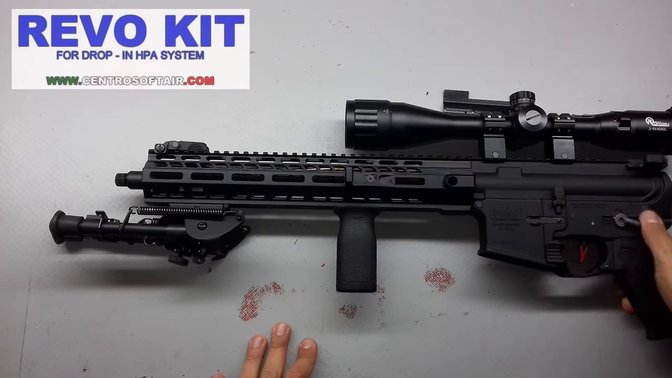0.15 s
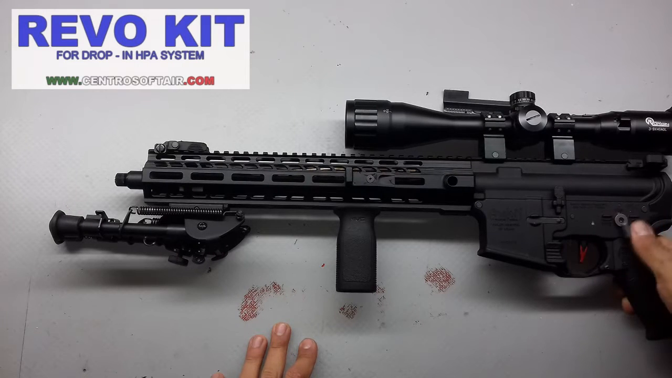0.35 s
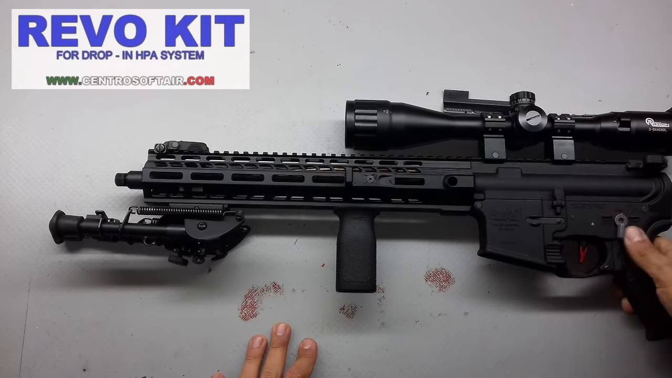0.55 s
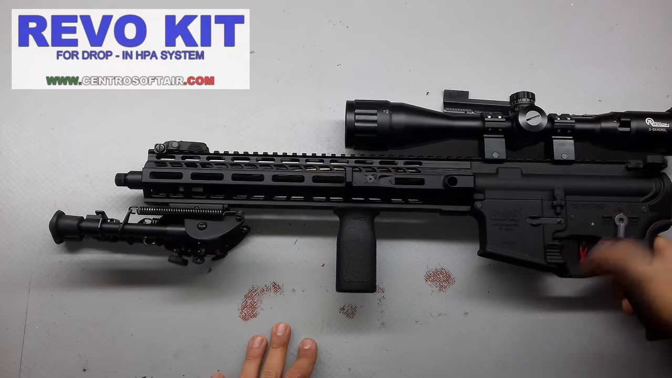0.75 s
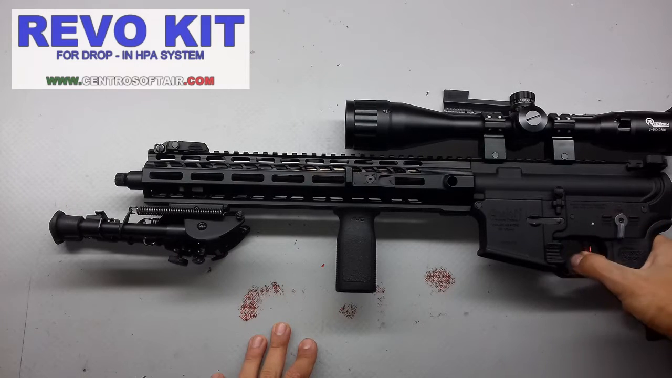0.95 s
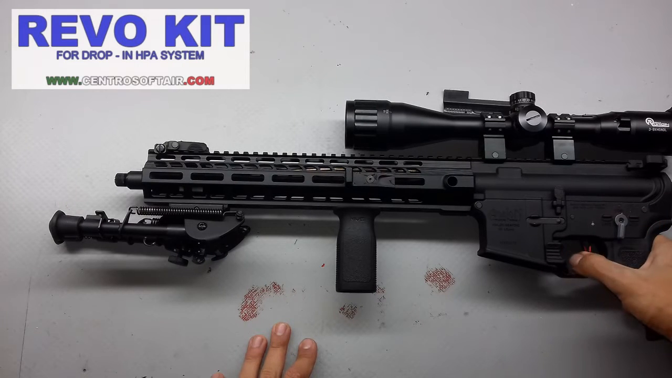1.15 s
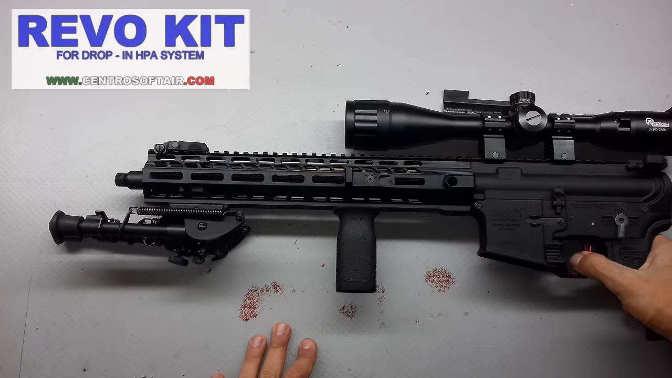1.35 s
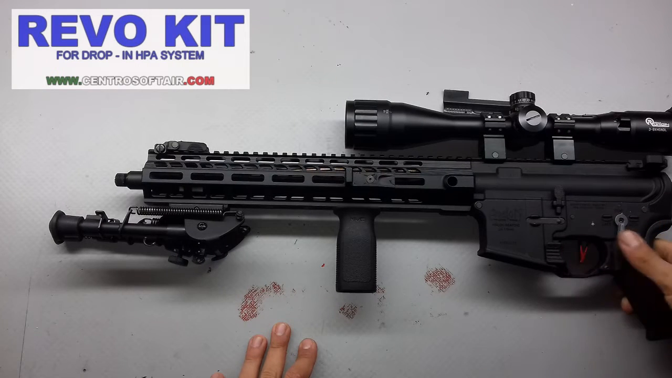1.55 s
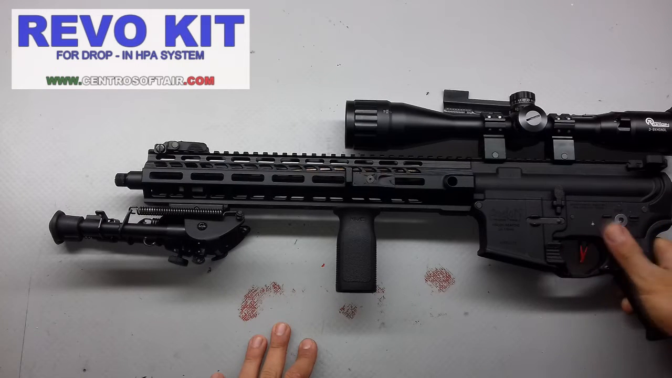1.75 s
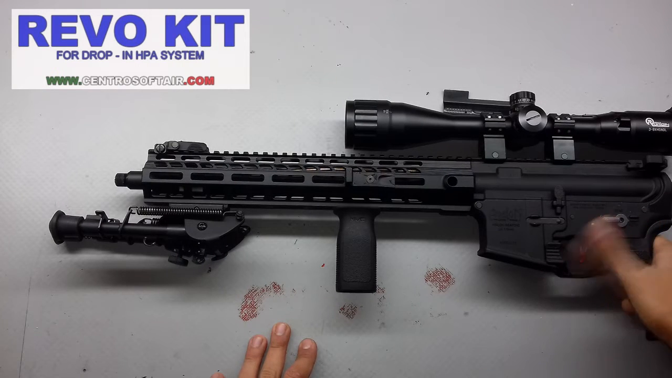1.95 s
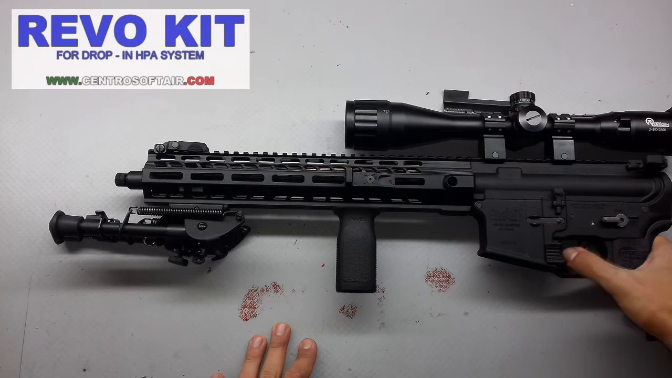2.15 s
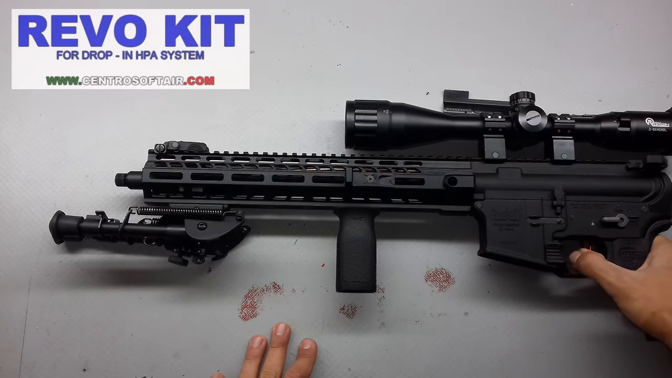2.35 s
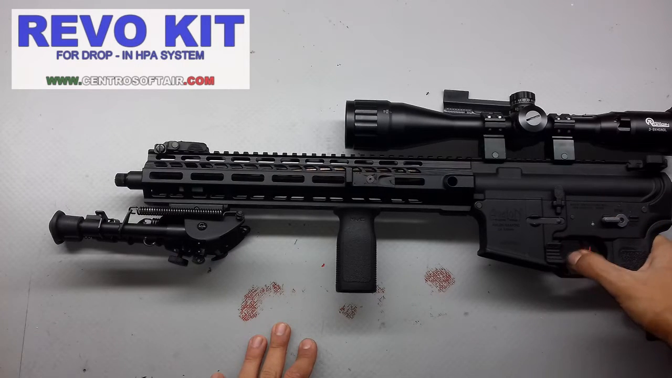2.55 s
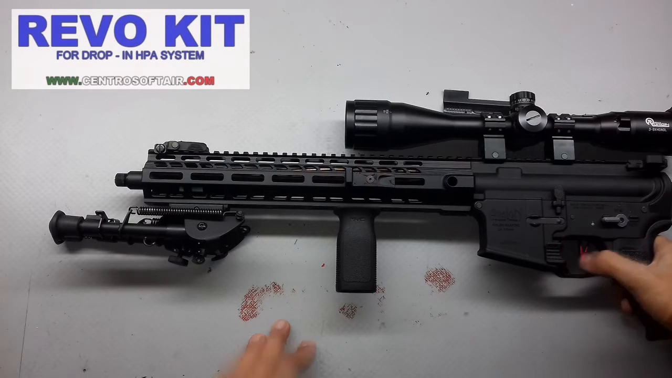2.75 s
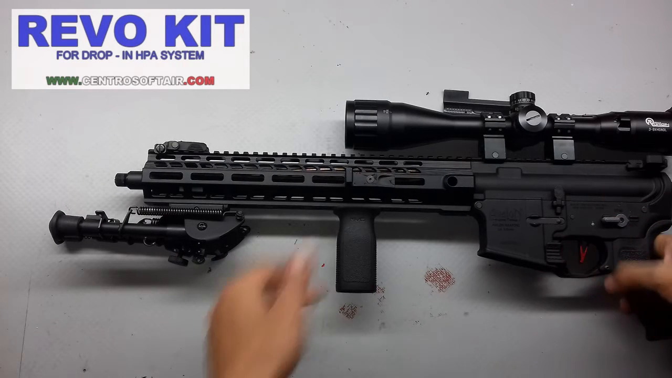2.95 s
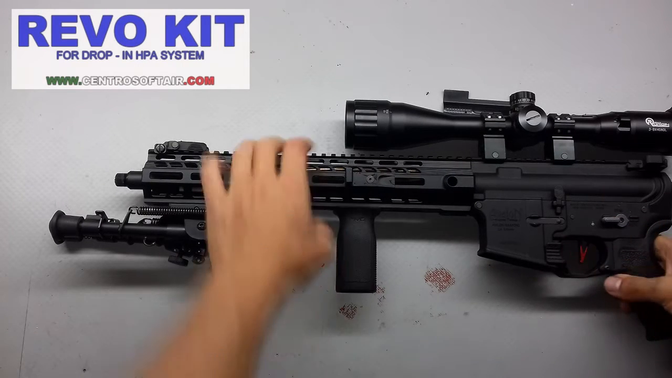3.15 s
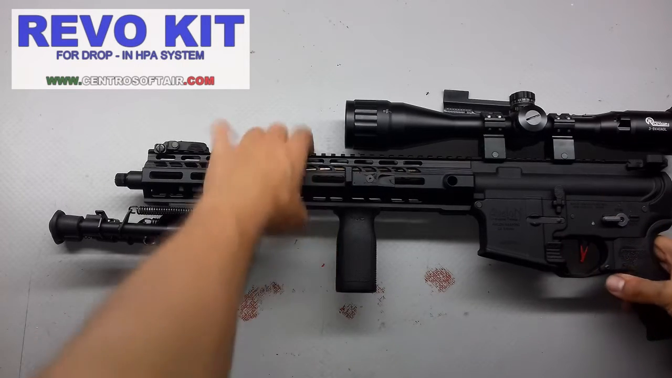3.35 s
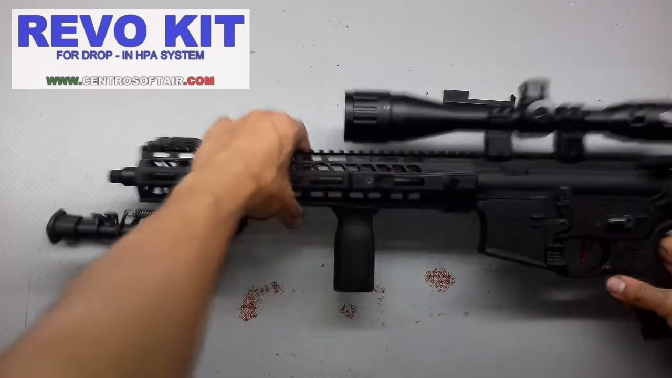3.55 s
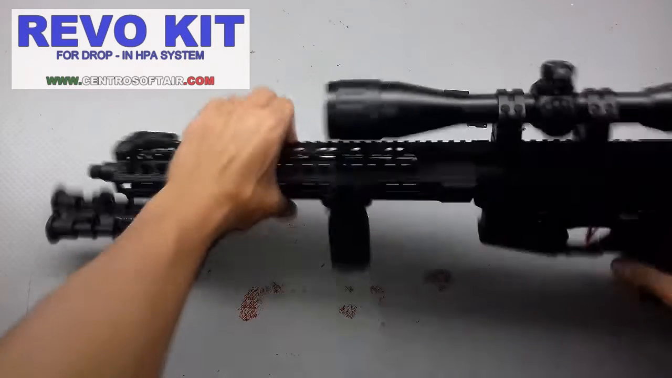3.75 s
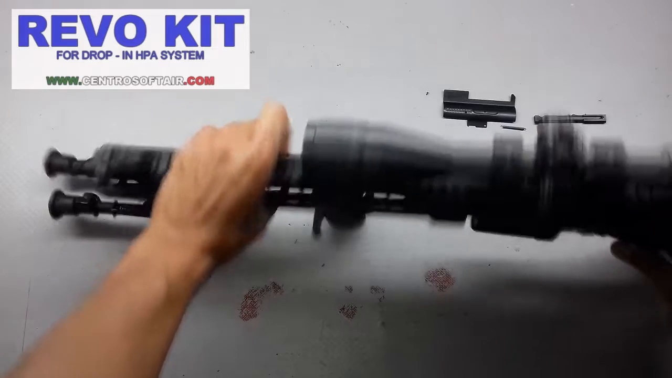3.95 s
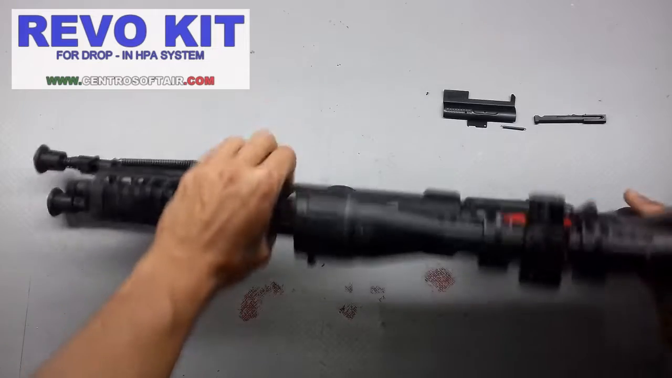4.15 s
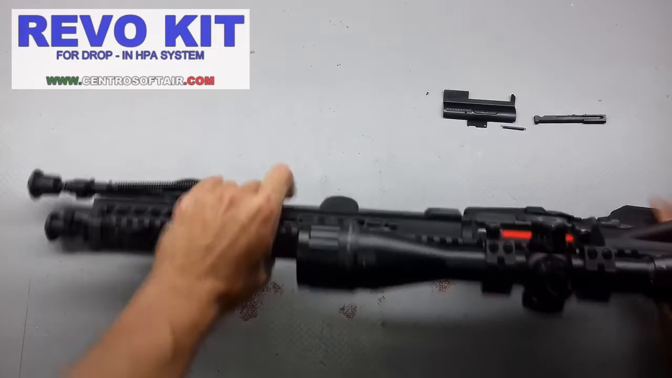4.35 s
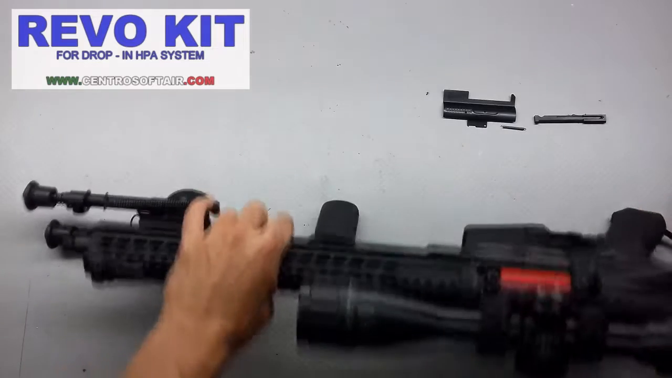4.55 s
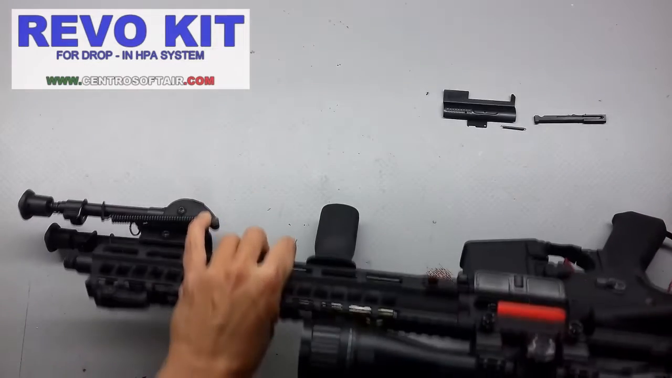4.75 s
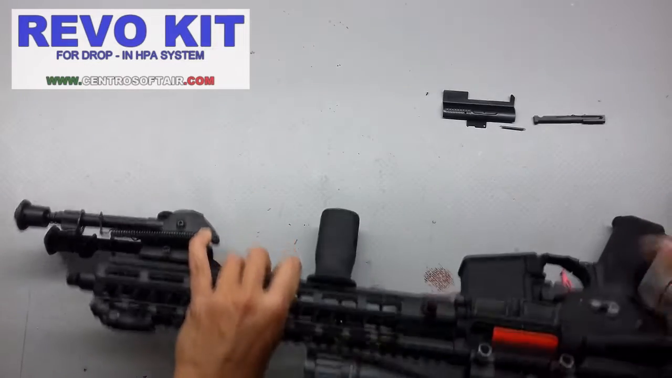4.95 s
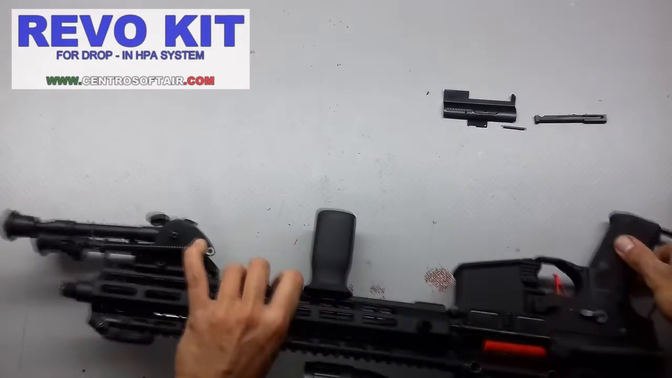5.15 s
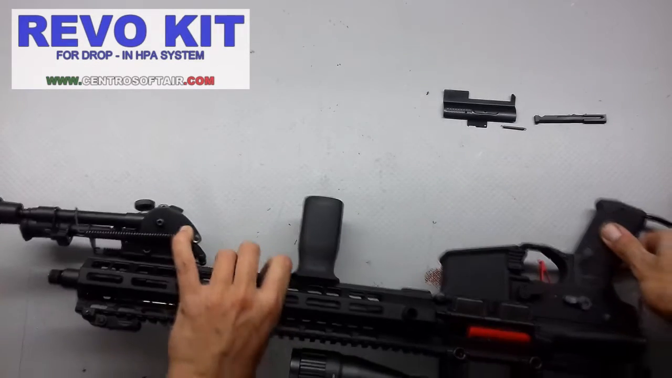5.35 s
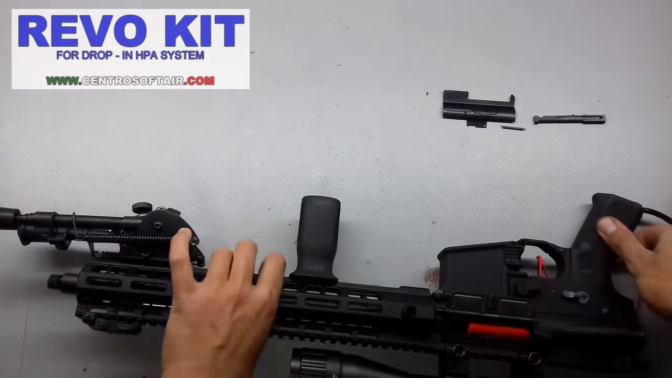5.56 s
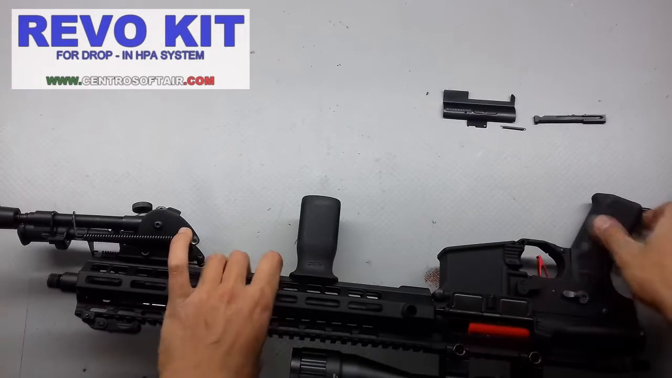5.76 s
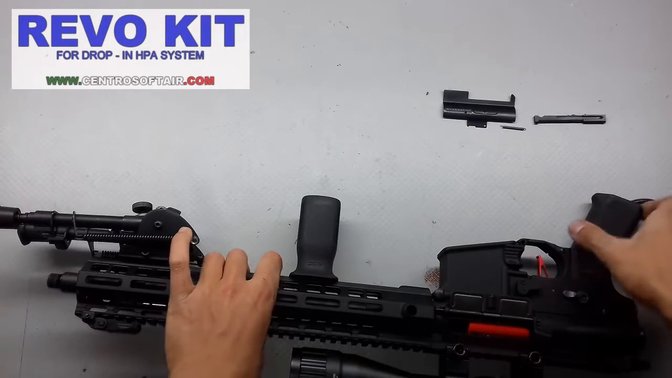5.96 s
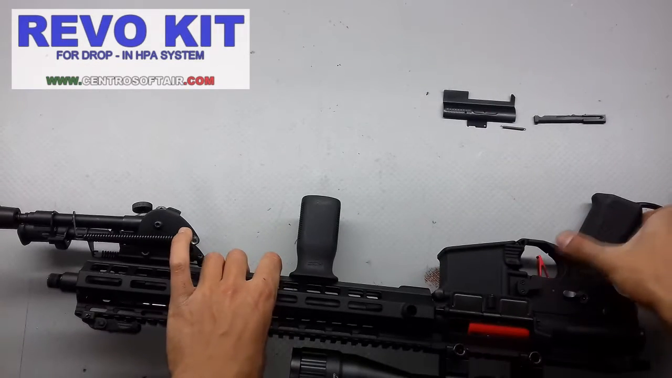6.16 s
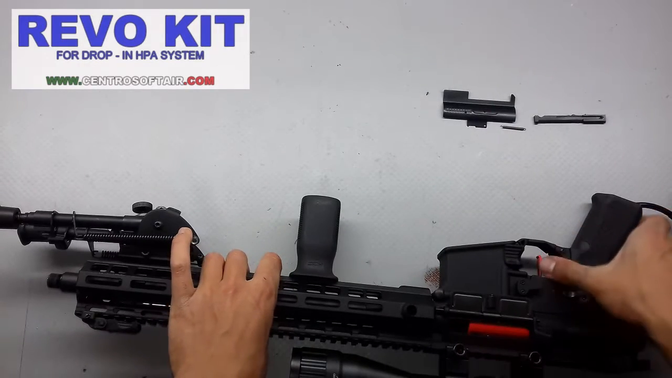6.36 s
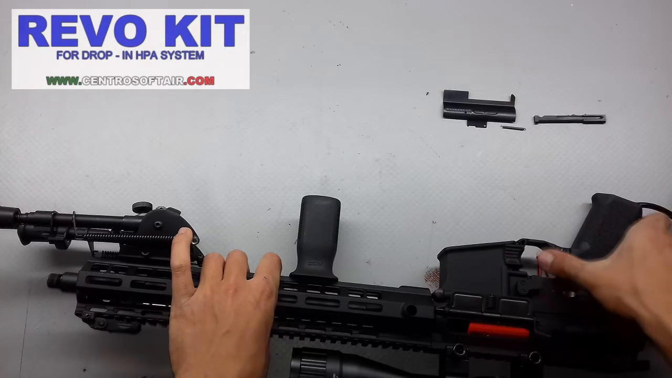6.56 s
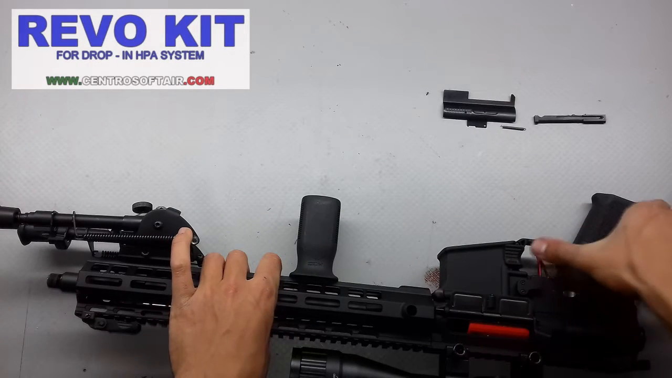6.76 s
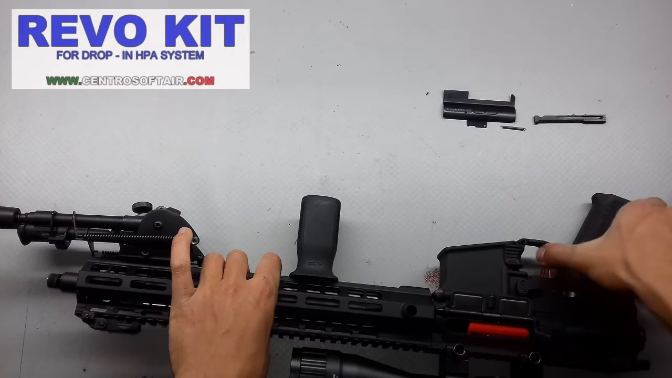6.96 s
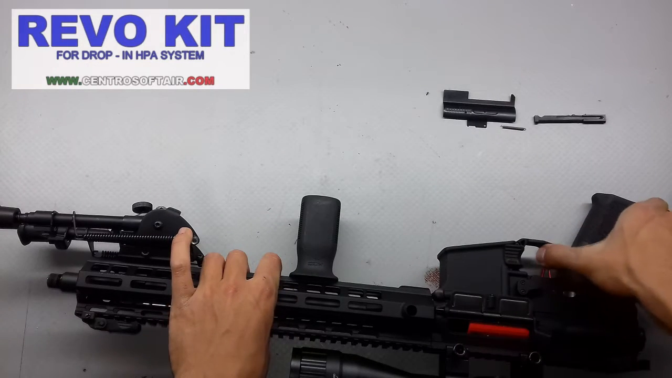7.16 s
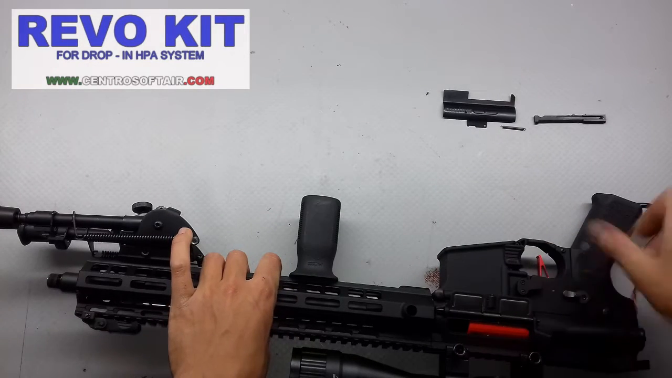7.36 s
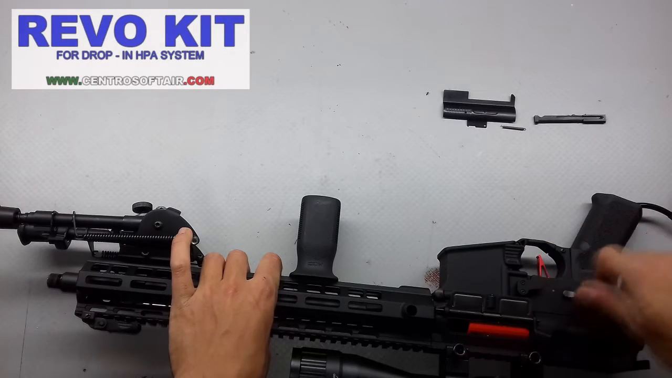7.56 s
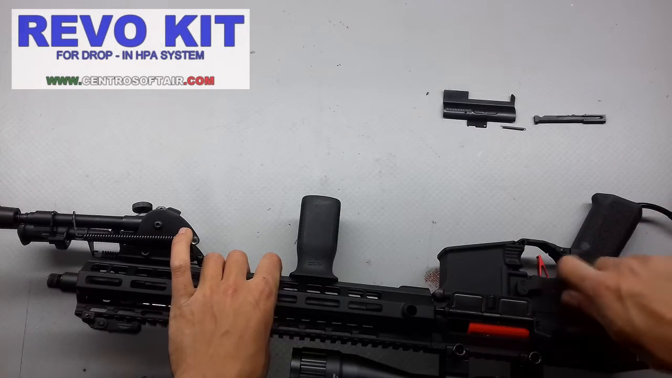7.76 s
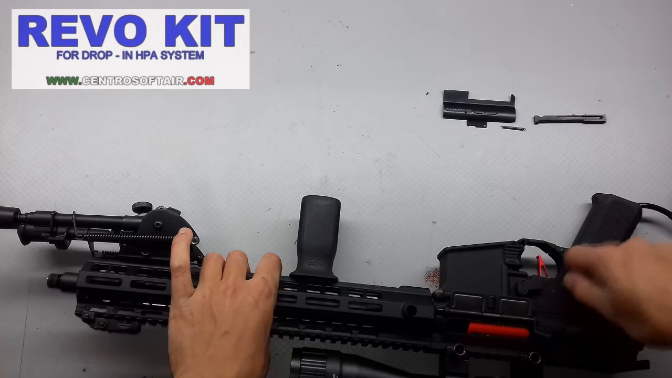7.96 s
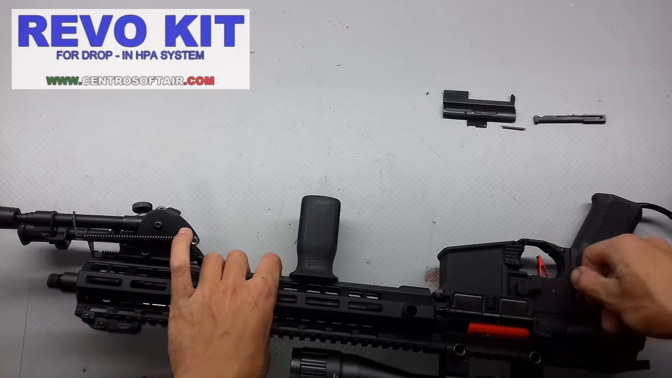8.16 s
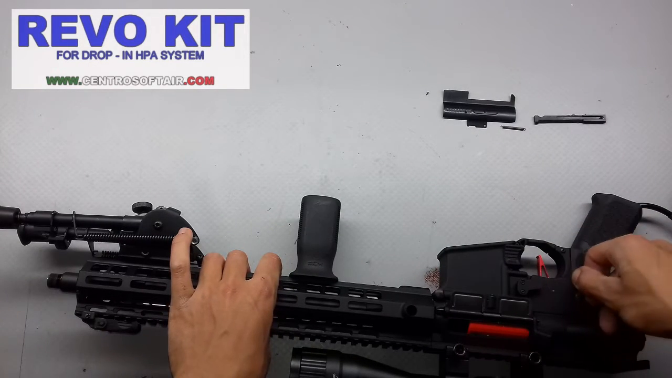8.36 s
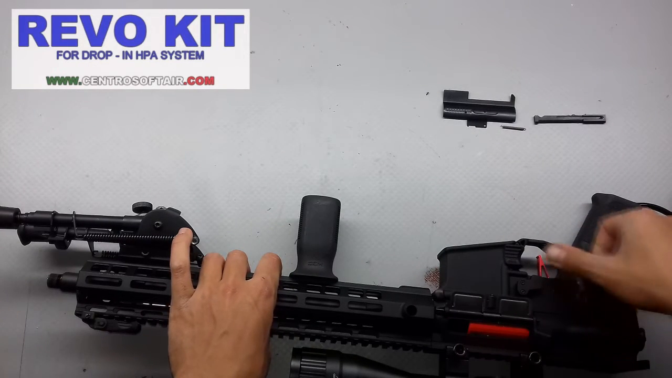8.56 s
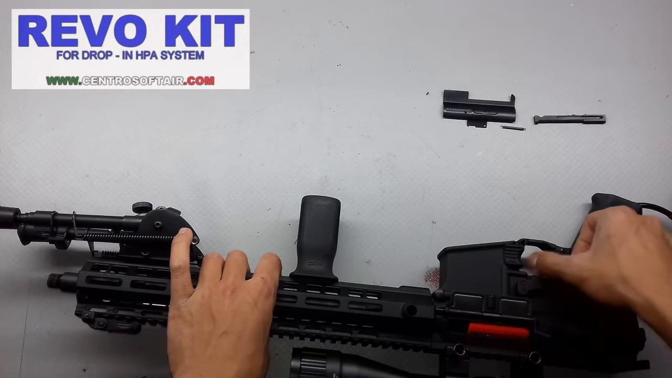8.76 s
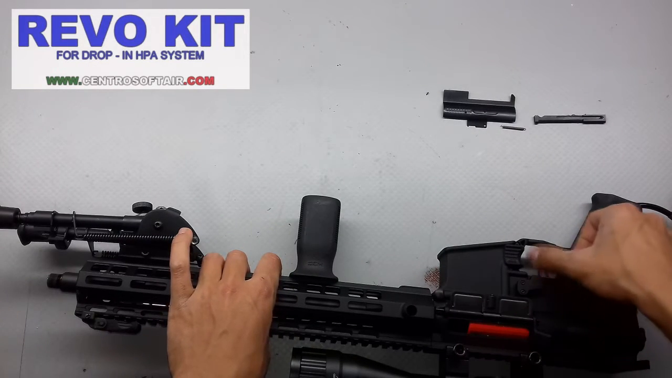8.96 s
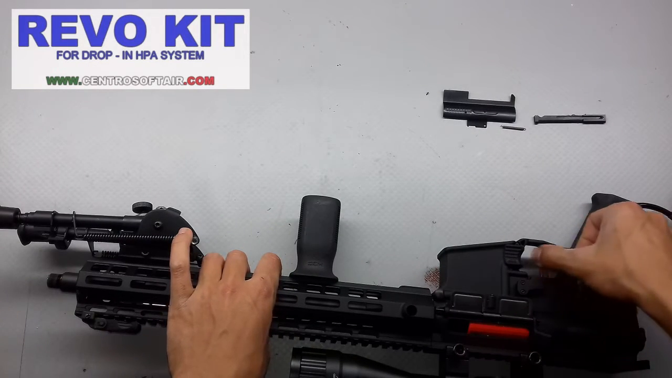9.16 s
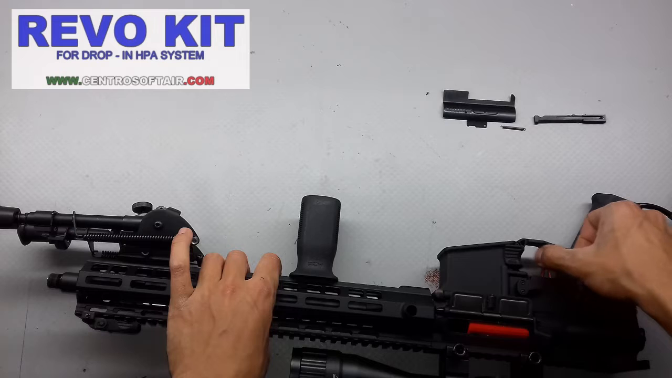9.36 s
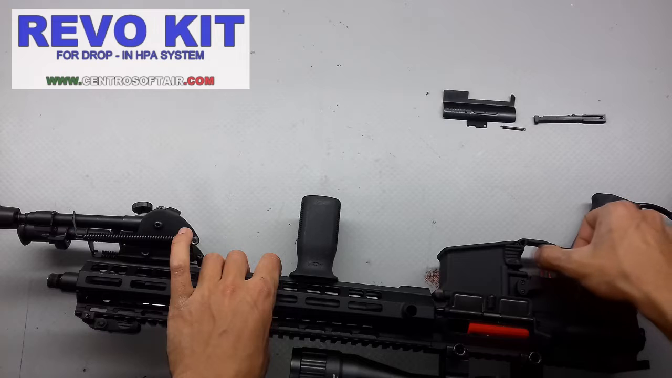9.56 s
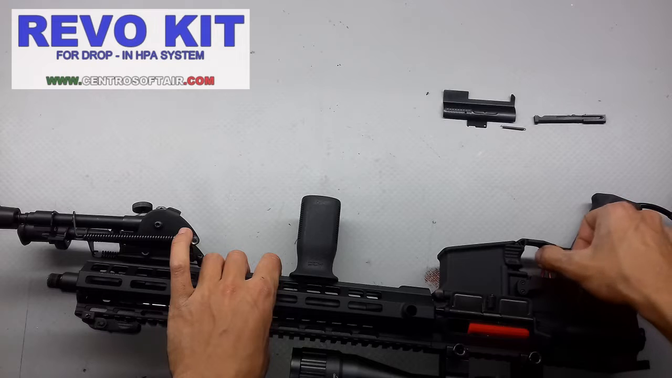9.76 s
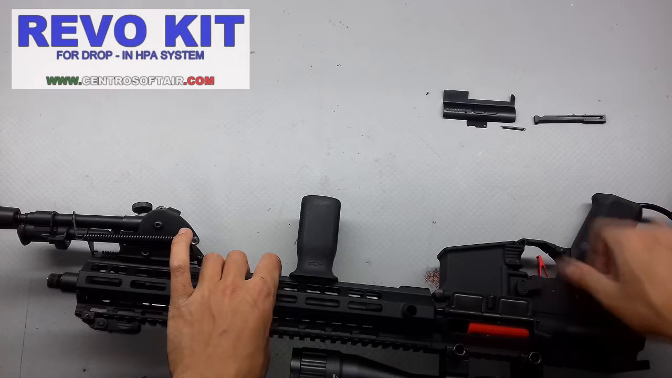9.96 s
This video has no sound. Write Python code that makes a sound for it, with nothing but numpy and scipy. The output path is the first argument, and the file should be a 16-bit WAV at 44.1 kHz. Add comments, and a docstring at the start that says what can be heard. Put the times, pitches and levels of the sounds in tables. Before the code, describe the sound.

A small, live room with very faint steady hiss, closely miked. Soft selector clicks and a dragged lever tick within the first half second. Loud single air shots crack at about 1.0, 1.2 and 1.35 s: a punchy pop, spitting valve hiss, metallic clack, brief rising hoot and short room reflections. A crisp click at 1.85 s precedes a rapid, even six-round burst from 2.25 to 2.6 s, building slightly. From 2.9 s hands rustle over the rifle with faint squeaks; dull knocks land around 4.1-4.2 s with small rocking bumps, then clacks and thuds at 5.05-5.3 s. Light rubbing and lever ticks continue to about 6.3 s. A second six-round burst runs 6.97-7.35 s. A sharp click snaps at 7.8 s, with fainter ones after. Single shots follow at 8.85, 9.1, 9.5 and 9.67 s, then a faint click at 9.9 s.

```python
"""A small room with a table: an air-driven airsoft rifle is dry-fired, single shots and two six-round bursts.
Each shot is filtered impulses for the pop of air, hissing noise for the valve and a gliding sine for the
barrel's hoot. Between shots, filtered noise and dying sines make the selector's clicks, rubbing hands and
knocks as the rifle is lifted, turned over and set down. Echoes and reverberation throw it all back."""
import sys
import numpy as np
from scipy import signal
from scipy.io import wavfile
from scipy.ndimage import uniform_filter1d

SR = 44100
rng = np.random.default_rng(int(sys.argv[2]) if len(sys.argv) > 2 else 0)


def int16_out(signal):
    """Quantize to a 16-bit WAV file."""
    q = np.round(np.clip(np.atleast_2d(signal).T, -1, 1) * 32767)
    wavfile.write(sys.argv[1], SR, q.astype(np.int16))


N = 441000  # length [samples]

# still room: (frequency [Hz], relative density [dB per Hz])
AIR_SPECTRUM = [(15, -29), (25, -4.5), (33, -20), (114, -3.5), (200, -11), (270, -9), (384, -11.5),
                (503, -10), (754, -14), (863, -12), (1040, -15), (3080, -19), (4610, -30.5), (13600, -33),
                (16000, -30.5)]
AIR_DB = -67.5  # rms ahead of the microphone [dB]

# hands sliding over the rifle: (start [s], length [s], relative level at the middle [dB])
STROKES = [(.03, 0.073, -63), (2.884, 0.22, -62), (3.116, 0.45, -53), (3.548, 0.52, -58),
           (3.984, 0.52, -49.5), (4.48, 0.31, -56.5), (5.095, 0.4, -47.5), (5.496, 0.23, -59),
           (5.711, 0.12, -55.5), (5.853, .14, -54), (6.0, .35, -67)]
STROKE_SHAPE = 0.63  # power of the arch: higher is more peaked
# skin on the rifle: (frequency [Hz], relative density [dB per Hz])
RUBBING_SPECTRUM = [(59, -10), (100, -34), (129, -3.5), (210, -11), (335, -5), (1330, -13.5), (1830, -15),
                    (3190, -12.5), (4110, -14.5), (5770, -43), (16000, -53)]
# loose fittings tick at random around a stroke; level and spread are relative to the stroke,
# TICK_S is a decay constant
TICKS_PER_S, TICK_DB, TICK_SPREAD_DB, TICK_S, TICK_HZ = 9, 1, 9, 0.0021, 2620

# selector, trigger and fittings snapping into place:
# (time [s], relative level [dB], main resonance [Hz])
CLICKS = [(.155, -50.5, 3160), (0.199, -48, 3000), (0.351, -34.5, 2700), (.435, -35.5, 2180),
          (.444, -36.5, 2720), (1.8531, -22.5, 3450), (3.803, -48, 2150), (3.874, -50.5, 1490),
          (4.636, -44, 2820), (4.675, -44.5, 1900), (5.160, -38, 2000), (5.208, -31, 3200),
          (5.214, -24.5, 3340), (5.253, -29, 2800), (5.2562, -23, 3240), (5.323, -37.5, 3290),
          (5.523, -50, 3550), (6.73, -58.5, 2490), (6.949, -55.5, 3070), (7.808, -22.5, 3135),
          (7.946, -43, 3000), (8.486, -45.5, 2885), (9.880, -43, 2750)]
CLICK_S = 0.0052  # decay constant of the scrape [s]
# small parts in general: (frequency [Hz], relative density [dB per Hz])
CLICK_SPECTRUM = [(150, -22), (700, -11.5), (1200, -4), (2100, -2.5), (3000, -5), (3800, 1), (4400, -12),
                  (5200, -20.5), (7500, -27.5), (10000, -44), (16000, -40)]
# a lever dragged along its seat in a run of slips:
# (start [s], length [s], relative level at the start [dB], relative level at the end [dB])
DRAGS = [(0.341, .14, -40, -46.5), (1.723, 0.1, -47.5, -35), (5.933, .03, -44, -50),
         (7.818, 0.031, -32.5, -43)]
# mean gap, timing scatter, decay constant and resonance of the slips
SLIP_GAP_S, SLIP_JITTER_S, SLIP_S, SLIP_HZ = 0.026, 0.0056, 0.011, 2300

# rifle against hand and table:
# (time [s], relative level [dB], contact pitch [Hz], relative clatter of the fittings [dB])
KNOCKS = [(.386, -49.5, 420, -41), (1.856, -53, 160, -49), (3.227, -50, 162, -48.5),
          (3.965, -46.5, 298, -43), (4.101, -44.5, 140, -42.5), (4.148, -44, 110, -57),
          (4.177, -29, 149.2, -40.5), (4.185, -28, 183, -45), (4.199, -35.5, 533, -56),
          (5.054, -36, 360, -40), (5.124, -30.5, 630, -34.5), (5.191, -31.5, 398, -45),
          (5.197, -30, 121, -53), (5.215, -35, 110, -42), (5.260, -28.5, 119, -48)]
CLATTER_S, CLATTER_HZ = 0.007, 1820  # decay constant and resonance
# the rifle rocks after landing, in even bumps: (first bump [s], relative level [dB], pitch [Hz])
ROCKS = [(4.264, -42.5, 119), (5.325, -47, 85)]
ROCK_GAP_S = .04
# modes of the tabletop: (frequency [Hz], relative level [dB], time to fall 60 dB [s])
TABLETOP = [(62.3, -3, .55), (80.2, -2, .32), (113, -1.5, .24), (130.6, -.5, .27), (177.4, -.5, .27),
            (280, -4, .13), (406.5, .5, .13), (487.4, 3, .15)]
# the tabletop answers deep contacts more than bright ones
TABLE_ANSWER_DB, TABLE_ANSWER_HZ, TABLE_DB_PER_OCTAVE = -2, 130, -4

# trigger pulls: (time [s], rounds fired [count], relative valve snap [dB],
# hoot pitch at the middle [Hz], relative hoot [dB], hoot length [s])
PULLS = [(0.979, 1, -0.5, 1224, -2.5, 0.0093), (1.1894, 1, 3, 1180, 1.5, 0.011),
         (1.3496, 1, 4, 1195, 2, 0.0088), (2.2508, 6, 0, 1173, -3.5, 0.0081),
         (6.9744, 6, -.5, 1628, -7, 0.02), (8.8541, 1, .5, 1152, -7, 0.013),
         (9.0821, 1, 3.5, 1170, -4, .011), (9.5061, 1, 1, 1120, -8, 0.008),
         (9.6693, 1, 3.5, 1120, -6, 0.0057)]
# in a burst the valve cycles steadily, but every second round comes a little early
CYCLE_S, LIMP_S = .06892, .0016
# each round of a burst is stronger than the one before, up to a limit
BUILD_DB_PER_ROUND, BUILD_TOP_DB = 1.35, 4
# air leaving the muzzle: (frequency [Hz], relative density [dB per Hz])
POP_SPECTRUM = [(30, -30), (70, -24), (120, -9), (200, -3.5), (320, -1.5), (480, 3), (640, -3), (900, -11),
                (1500, -20.5), (4000, -51.5)]
# low ringing of rifle and room after a pop:
# (frequency [Hz], relative level [dB], time to fall 60 dB [s])
POP_RINGING = [(131, -11, .34), (165, -13, .3), (281, -9, .22), (313, -2, .24), (355, -2, .23),
               (401, -4, .2), (501, -1, .28), (524, -6, .24), (624, -3, .24), (654, -6, .24),
               (697, -8, .22), (995, -10, .3), (1102, -8, .34), (1160, -9, .26), (1228, -8, .24)]
# air rushing through the valve: (frequency [Hz], relative density [dB per Hz])
SNAP_SPECTRUM = [(200, -21), (600, -9), (1050, 5), (1350, -4.5), (1800, 1.5), (2400, -4.5), (2850, -0.5),
                 (3800, 0.5), (4300, -5), (5000, -13.5), (7000, -13), (10000, -21.5), (13000, -21.5),
                 (16000, -20.5)]
# metal parts of the receiver: (frequency [Hz], relative level [dB], time to fall 60 dB [s])
RECEIVER_METAL = [(1625, -1, .14), (1680, -3, .12), (2200, -7, .06), (2780, -2, .18), (3110, -3, .06),
                  (3460, -2, .06), (3690, 0, .05), (3835, -3, .16)]

# skin scuffing and squeaking on the handguard:
# (time [s], length [s], first pitch [Hz], last pitch [Hz], width [Hz], level [dB])
SQUEAKS = [(3.435, .055, 2700, 2000, 1400, -51), (3.445, .06, 1500, 800, 500, -52),
           (4.26, .18, 2890, 2830, 130, -55)]

# reflections off table, walls and ceiling: (delay [s], relative level [dB])
ECHOES = [(.0022, -17), (.0064, -8.5), (.0088, -16.5), (.0120, -10), (0.0154, -9.5), (0.0243, -2.5),
          (0.0257, -4.5), (.0272, -4), (0.0347, -12.5), (.0500, -21), (0.0541, -12.5), (0.0605, -16.5)]
# reverberation time: (frequency [Hz], time to fall 60 dB [s])
REVERB_DECAY = [(100, 0.11), (260, 0.26), (700, 0.34), (1800, 0.31), (3800, 0.35), (7000, 0.33),
                (14000, .26)]
# strength of the reverberation: (frequency [Hz], relative level [dB])
REVERB_STRENGTH = [(100, -2.5), (500, 0.5), (1200, -0.5), (3800, -2), (7000, -1.5), (14000, -3)]

CEILING = .85  # where the microphone's loudest peaks level off [1 = full scale]
EDGE_HZ = 16100  # upper band limit


def amp(db):
    """Decibels to gain."""
    return 10 ** (np.asarray(db) / 20)


def evened(x):
    """Scales to rms 1."""
    return x / np.sqrt(np.mean(x ** 2) + 1e-20)


def read(points, hz):
    """Reads a table on a log-frequency axis."""
    f, value = np.transpose(points)
    return np.interp(np.log(hz + 1), np.log(f + 1), value)


def add(mix, s, sound):
    """Mixes a sound in at s seconds."""
    part = mix[round(s * SR):][:len(sound)]
    part += sound[:len(part)]


def through(x, response):
    """Convolves and keeps the length."""
    return signal.oaconvolve(x, response)[:len(x)]


def colour(points, size=4096):
    """Causal (minimum-phase) impulse response of energy 1 with the given spectrum."""
    log_gain = np.log(amp(read(points, abs(np.fft.fftfreq(size, 1 / SR)))))
    minimum_phase = np.exp(np.conj(signal.hilbert(log_gain)))
    response = np.fft.ifft(minimum_phase).real[:size // 2]
    return response / np.linalg.norm(response)


def ring(modes):
    """Dying sines of a struck object, energy 1."""
    t = np.arange(SR // 2) / SR
    sound = np.zeros(len(t))
    for hz, db, t60 in modes:
        sound += amp(db - 60 * t / t60) * np.sin(2 * np.pi * hz * t)
    return sound / np.linalg.norm(sound)


def burst(t, rise, fall):
    """Noise that swells and dies away, with time constants in seconds."""
    t = np.maximum(t, 0)
    return rng.standard_normal(len(t)) * (1 - np.exp(-t / rise)) * np.exp(-t / fall)


def still_air():
    """The room at rest: a faint steady hiss of shaped noise."""
    return amp(AIR_DB) * evened(through(rng.standard_normal(N), colour(AIR_SPECTRUM)))


def hands(rub_db=-4, grains_per_s=900, grain_db=3):
    """Skin sticks and slips on the rifle: fine grains in a soft rustle, each stroke swelling and fading."""
    level = np.zeros(N)
    for s, length, db in STROKES:
        arch = abs(np.sin(np.linspace(0, np.pi, round(length * SR)))) ** STROKE_SHAPE
        add(level, s, amp(db + rub_db) * arch)
    sizes = amp(grain_db * np.minimum(rng.exponential(1, N), 4))
    grains = (rng.random(N) < grains_per_s / SR) * sizes * rng.choice([-1, 1], N)
    friction = evened(grains) + rng.standard_normal(N)
    return level * evened(through(friction, colour(RUBBING_SPECTRUM)))


def ticks():
    """Faint chance ticks of loose fittings around each stroke, as (s, dB, decay s, Hz)."""
    rows = []
    for start, length, db in STROKES:
        draws = rng.uniform(-1.1, 1, (round(TICKS_PER_S * length), 3))
        for when, strength, octaves in draws:
            s = start + length * (1 + when) / 2
            tick_db = db + TICK_DB + TICK_SPREAD_DB * strength
            rows.append((s, tick_db, TICK_S, TICK_HZ * 2 ** (octaves / 2)))
    return rows


def slips():
    """A dragged lever sticks and slips at a nearly even pace, as (s, dB, decay s, Hz)."""
    rows = []
    for start, length, first_db, last_db in DRAGS:
        for t in np.arange(0, length, SLIP_GAP_S):
            s = start + t + SLIP_JITTER_S * rng.standard_normal()
            db = first_db + (last_db - first_db) * t / length
            rows.append((s, db, SLIP_S, SLIP_HZ))
    return rows


def small_contacts():
    """Clicks, the clatter that each knock shakes loose, slips and ticks, as (s, dB, decay s, Hz)."""
    snaps = [(s, db, CLICK_S, hz) for s, db, hz in CLICKS]
    clatter = [(s, db, CLATTER_S, CLATTER_HZ) for s, _, _, db in KNOCKS]
    return snaps + clatter + slips() + ticks()


def clicks(click_db=1, sharpness=2, part_db=5):
    """Small parts strike and scrape briefly, each with a resonance of its own."""
    t, force = np.arange(SR // 8) / SR, np.zeros(N)
    for s, db, fall, hz in small_contacts():
        strike = burst(t, rise=.0001, fall=0.00033)
        scrape = burst(t, rise=0.00062, fall=fall) + strike
        part = signal.lfilter(*signal.iirpeak(hz, sharpness, fs=SR), scrape)
        add(force, s, amp(click_db + db) * (.5 * scrape + .5 * amp(part_db) * part))
    return through(force, colour(CLICK_SPECTRUM))


def heavy_contacts(count=3):
    """Knocks and the bumps of the rocking rifle, as (s, dB, Hz, dB of the tabletop's answer)."""
    bumps = [(s + k * ROCK_GAP_S, db, hz) for s, db, hz in ROCKS for k in range(count)]
    rows = []
    for s, db, hz, *_ in KNOCKS + bumps:
        octaves = np.log2(hz / TABLE_ANSWER_HZ)
        rows.append((s, db, hz, TABLE_ANSWER_DB + TABLE_DB_PER_OCTAVE * octaves))
    return rows


def knocks(table_reach=2.1, knock_db=23, cycles=0.79, scuff=0.18):
    """A contact is a short dead thud; the tabletop rings on, low-passed at about twice the thud's pitch."""
    t, out = np.arange(SR // 2) / SR, np.zeros(N)
    for s, db, hz, table_db in heavy_contacts():
        force = signal.unit_impulse(len(t)) + scuff * burst(t, rise=0.00098, fall=0.01)
        body = t * np.exp(-hz * t / cycles * 2) * np.sin(2 * np.pi * hz * t)
        thud = through(force, body)
        thud = thud / np.linalg.norm(thud)
        low_pass = signal.butter(2, table_reach * hz, fs=SR, output="sos")
        table = signal.sosfilt(low_pass, ring(TABLETOP))
        table = table / np.linalg.norm(table)
        add(out, s, amp(knock_db + db) * (thud + amp(table_db) * table))
    return out


def shots():
    """Rounds fired by the trigger pulls, as (s, snap dB, hoot Hz, hoot dB, hoot length s)."""
    rows = []
    for s, rounds, snap_db, hz, hoot_db, length in PULLS:
        for k in range(round(rounds)):
            build_db = min(k * BUILD_DB_PER_ROUND, BUILD_TOP_DB)
            when = s + k * CYCLE_S - k % 2 * LIMP_S
            rows.append((when, snap_db + build_db, hz, hoot_db + build_db, length))
    return rows


def pops(pop_db=9.0, follows_snap=.2, ring_db=-8, table_db=-21):
    """A slug of air leaves the muzzle, a little larger after a hard snap; its jolt rings rifle and tabletop."""
    kicks = np.zeros(N)
    for s, db, *_ in shots():
        add(kicks, s, [amp(pop_db + follows_snap * db)])
    kicks = signal.sosfilt(signal.butter(2, 85, "high", fs=SR, output="sos"), kicks)
    resonance = amp(ring_db) * ring(POP_RINGING) + amp(table_db) * ring(TABLETOP)
    return -through(kicks, colour(POP_SPECTRUM)), through(kicks, resonance)


def valve(snap_db=-14, fall=0.01, thin_hz=1700, return_s=.0095, return_db=-3, return_fall=0.01,
          dull_hz=5000, metal_db=-15, rattle_db=2.0):
    """The valve opens with a thin, spitting hiss; then the nozzle slides back with a fuller clack."""
    t, rush = np.arange(SR // 10) / SR, np.zeros(N)
    thin, dull = signal.butter(1, thin_hz, "high", fs=SR), signal.butter(1, dull_hz, fs=SR)
    for s, db, *_ in shots():
        opening = signal.lfilter(*thin, burst(t, rise=0.00089, fall=fall))
        closing = signal.lfilter(*dull, burst(t - return_s, rise=0.00042, fall=return_fall))
        chatter = evened(uniform_filter1d(rng.standard_normal(len(t)), size=40))
        rattle = amp(rattle_db * chatter)  # parts chatter
        add(rush, s, amp(snap_db + db) * rattle * (opening + amp(return_db) * closing))
    return through(rush, colour(SNAP_SPECTRUM)) + amp(metal_db) * through(rush, ring(RECEIVER_METAL))


def barrel(hoot_db=-14, lag=.0085, glide=0.093, rough=0.027):
    """Air streaming out of the barrel hoots briefly, an unsteady sine that rises as it goes."""
    out = np.zeros(N)
    for s, _, hz, db, length in shots():
        u = np.linspace(0, 1, round(length * SR))
        flutter = evened(uniform_filter1d(rng.standard_normal(len(u)), size=30))
        turns = np.cumsum(hz * (1 + glide * (u - .5) + rough * flutter)) / SR
        swell = np.sin(np.pi * u)
        add(out, s + lag, amp(hoot_db + db) * swell * np.sin(2 * np.pi * turns))
    return out


def squeaks():
    """A finger slips in quick, uneven cycles: a fuzzy band that glides."""
    out = np.zeros(N)
    for s, length, first_hz, last_hz, width, db in SQUEAKS:
        hz = np.linspace(first_hz, last_hz, round(length * SR))
        low_pass = signal.butter(2, width / 2, fs=SR, output="sos")
        grip = signal.sosfilt(low_pass, rng.standard_normal(len(hz)))
        slip = evened(grip * np.sin(2 * np.pi * np.cumsum(hz) / SR))
        add(out, s, amp(db) * slip * np.hanning(len(hz)))
    return out


def echoes(x, echo_db, dull_hz=5000):
    """Distinct first reflections, duller than the direct sound."""
    out, dull = np.zeros(N), signal.lfilter(*signal.butter(2, dull_hz, fs=SR), x)
    for delay, db in ECHOES:
        add(out, delay, amp(db + echo_db) * dull)
    return out


def reverb(x, start=0.0041, build=0.016):
    """Dense late reflections, each band dying at its own speed; start and build-up in seconds."""
    taps = rng.choice([-1., 1.], SR) * (rng.random(SR) < .1)
    hz, t, bands = signal.stft(taps, SR, nperseg=256)
    fade_db = read(REVERB_STRENGTH, hz)[:, None] - 60 * t / read(REVERB_DECAY, hz)[:, None]
    tail = signal.istft(bands * amp(fade_db), SR, nperseg=256)[1][:SR]
    tail = tail * np.clip((np.arange(SR) / SR - start) / build, 0, 1)
    return through(x, tail / np.linalg.norm(tail))


def scene():
    """Shots and handling in the room, over a faint steady hiss."""
    air = still_air()
    handling = hands() + clicks() + squeaks()
    thuds = knocks()
    pop, ringing = pops()
    snap, hoot = valve(), barrel()
    direct = pop + ringing + snap + hoot + handling + thuds
    early = echoes(pop, echo_db=-2.0) + echoes(snap, echo_db=-11.0)
    early += echoes(hoot, echo_db=-11) + echoes(handling, echo_db=-19.5)
    # muzzle, receiver and tabletop each reach the room's reflections by their own paths
    late = reverb(amp(-4.0) * pop + amp(-14.0) * hoot)
    late += reverb(amp(-5.0) * snap)
    late += reverb(amp(-10) * handling + amp(-10) * thuds)
    return (direct + early + late + air)[None]


def record(dry, low_cut_hz=40):
    """The microphone drops the deepest bass and rounds off the loudest peaks; then the band limit."""
    thin = signal.sosfilt(signal.butter(2, low_cut_hz, "high", fs=SR, output="sos"), dry)
    rounded = thin / (1 + (thin / CEILING) ** 4) ** .25
    band_limit = signal.firwin(511, EDGE_HZ, window=("kaiser", 9), fs=SR)
    return signal.oaconvolve(rounded, band_limit[None], "same")


dry = scene()
out = record(dry)
int16_out(out)
```